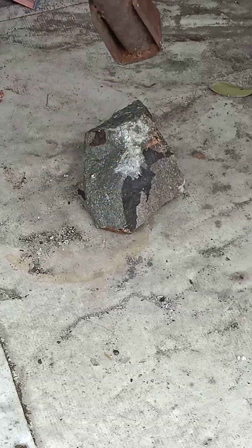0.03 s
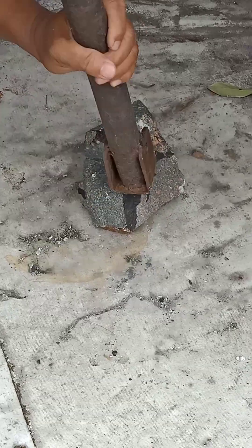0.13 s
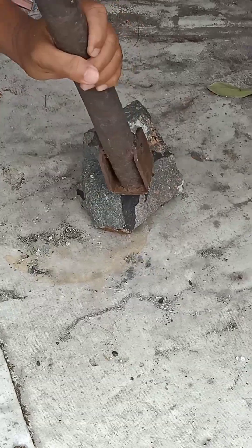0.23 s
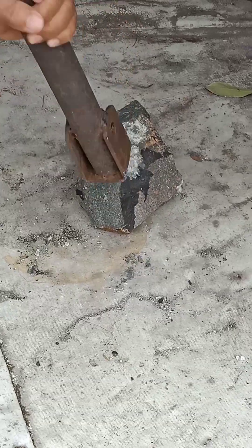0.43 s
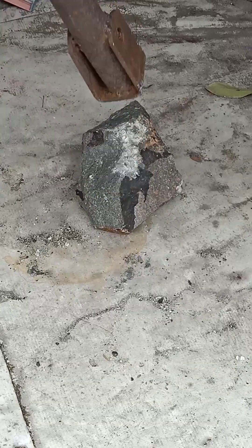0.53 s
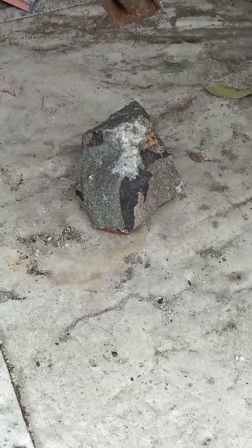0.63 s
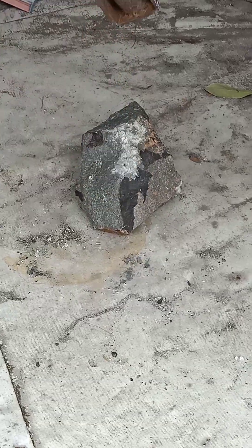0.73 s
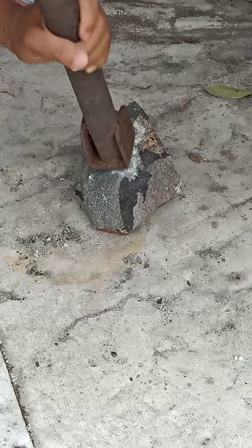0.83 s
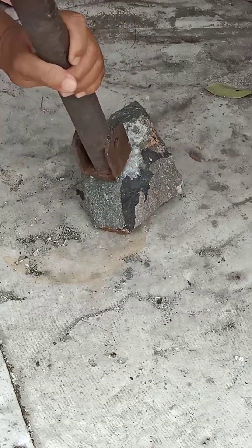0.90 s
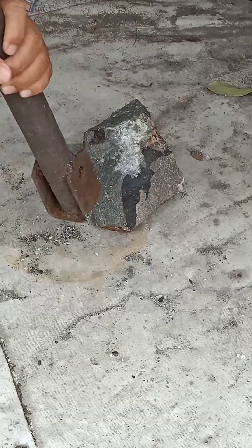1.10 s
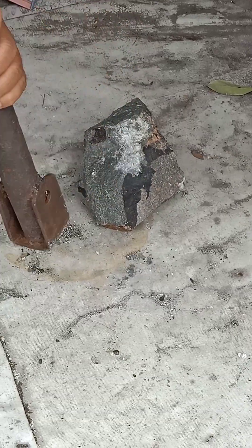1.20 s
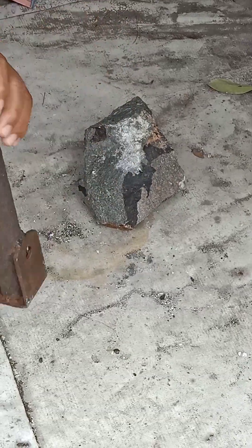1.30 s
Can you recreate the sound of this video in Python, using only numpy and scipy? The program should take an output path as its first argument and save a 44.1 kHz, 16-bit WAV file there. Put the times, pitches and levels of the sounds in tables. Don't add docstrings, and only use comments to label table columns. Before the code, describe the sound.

Two hard, clipped knocks of metal on stone, each ringing briefly, then a faint scuff on concrete

```python
import sys
import numpy as np
from scipy import signal
from scipy.fft import rfft, irfft, next_fast_len
from scipy.io import wavfile
from scipy.ndimage import uniform_filter1d, map_coordinates

SR = 44100
rng = np.random.default_rng(int(sys.argv[2]) if len(sys.argv) > 2 else 0)


def persist_wave(psi):
    counts = np.round(np.clip(psi, -1, 1) * 32767).astype(np.int16)
    wavfile.write(sys.argv[1], SR, np.atleast_2d(counts).T)


def magnitude_from_level(level_db):
    exponent = np.asarray(level_db, float) / 20
    return 10 ** exponent


N = 59535

# (time [s], knock level [dB], ring level [dB], contact time [s])
BLOWS = [
    (0.2306, 4.5, -25.5, 0.000081),
    (0.9581, 3, -30, 0.00008),
]
# (time after blow [s], level [dB])
CRUSH_STEPS = [
    [(-.0014, -41.5), (0, -8.5), (.00045, 2), (.0013, 5), (.0021, 2)],
    [(-.0015, -38), (-.0004, -5.5), (.0007, -0.5), (.0012, -3.5), (.003, -14)],
]
# (centre [Hz], width [Hz], level [dB])
ROCK_FACES = [
    [(207.7, 32, -8.5), (325, 98, -5.5), (487, 110, 3), (748, 198, 1.5), (990, 230, -8.5), (1227, 110, -12),
     (1744, 140, 9.5), (2250, 550, 5.5), (6496, 897, -9.5), (9350, 100, -28), (12400, 1200, -14.5)],
    [(210, 83, -1.5), (504, 248, 0.5), (1100, 430, -14), (1747, 180, -3), (1207, 356, -4), (2238, 197, 7.5),
     (3775, 69, 0.5), (5010, 534, -6.5), (7810, 550, -9.5), (9450, 87, -36), (11970, 770, -21),
     (13500, 450, -11), (15300, 400, -30)],
]
# (frequency [Hz], left lead [rad])
KNOCK_LEAD = [
    [(0, 0.5), (200, 0.5), (600, 1.4), (2300, 0.59), (5000, 2.8), (12000, 1.7)],
    [(0, -0.72), (200, 0.32), (600, 0.76), (2200, 0.82), (5000, 3.1), (12000, 1.4)],
]
# (frequency [Hz], left-right [dB])
KNOCK_LEAN = [
    [(130, 6), (290, -1), (640, -2), (1410, -3), (3100, -4), (6800, -3.5), (13000, -6.5)],
    [(130, 7.5), (290, -6), (640, -2), (1410, -2), (3100, -3.5), (6800, -7), (13000, -9)],
]

TUBE_HZ = [3044, 3044, 3655, 4177, 4168, 4852, 5227, 5496, 7060, 7800]
PLATE_HZ = [9351, 10360, 11470, 11650, 12035, 13650, 15050, 9055, 11030, 12800]
# (first blow level [dB], second blow level [dB], t60 [s], left-right [dB])
STEEL_MODES = [(3.5, 2, 0.35, 3.5), (-20.5, -21, 1, -8), (-29.5, 3, 0.06, -3), (-6, -47, .17, -2.5),
               (-19, -34, 0.58, -1.5), (-26, -29, 0.18, 11), (-20, -28, 0.21, 2), (-32.5, -33, 0.2, 5),
               (-30, -26, 0.16, 1.5), (-30.5, -15, 0.14, 1), (-35, -47, 0.089, -1.5), (-30, -31, 0.12, 0),
               (-26.5, -40, 0.14, 3), (-29.5, -33, .12, -3.5), (-28, -25.5, .13, -5.5), (-36, -24, .1, -3),
               (-30.5, -27, 0.09, -2), (-37.5, -27, .1, 4), (-40.5, -27.5, .11, -1), (-34, -28, .09, -1)]
# (twins' t60 factor [-], second twin's drop [Hz], other modes' t60 factor [-])
GRIP = [
    (1, 3.7, 0.71),
    (1.4, 4.1, 0.93),
]
# (pitch [Hz], level [dB], t60 [s])
EARLIER_RING = [
    (3406, -68.5, 0.54),
    (3010, -67, 0.27),
]
RING_RISE_S = 0.0018
RUST_WAVER_RAD, RUST_RATE_HZ = 0.35, 50

# (frequency [Hz], density [dB per Hz])
CHATTER_SPECTRUM = [(60, -48), (130, -5.5), (500, -4), (1300, -11), (2200, -3), (3000, -21.5), (5500, -22),
                    (8000, -68)]
CHATTER_DB, CHATTER_T60_S = -18.5, 0.084

# (frequency [Hz], t60 [s])
YARD_T60 = [(120, 0.52), (300, 0.48), (600, 0.36), (1200, 0.36), (2000, 0.21), (6000, 0.15), (12000, 0.15)]
# (frequency [Hz], gain [dB])
YARD_TONE = [(150, -2), (450, -1), (900, -1), (1800, -6), (2400, -5), (3100, 0.5), (5000, 2.5)]
YARD_KNOCK_DB, YARD_RING_DB, YARD_TOP_HZ = -14, -9, 5900

# (time [s], level [dB], pitch [Hz], push or pull [+1/-1])
THUMPS = [(1.306, -39, 600, -1), (1.311, -31, 900, 1), (0.288, -38, 131, 1), (.52, -42, 80, 1),
          (1.011, -32, 131, 1), (1.2563, -38, 650, 1), (.261, -19.5, 444, 1), (.274, -40, 480, -1),
          (0.289, -26, 330, 1), (0.49, -39, 192, 1), (0.5099, -34.5, 325, 1), (0.53, -39, 232, 1),
          (0.541, -58, 200, 1), (0.5607, -37.5, 307, -1), (0.602, -43, 147, 1), (0.636, -58, 151.5, 1),
          (0.771, -42, 142, -1), (1.18, -41, 200, 1), (1.217, -46, 200, 1), (1.321, -32.5, 175, -1)]
# (time [s], level [dB], length [s])
SCUFFS = [
    (1.165, -59, 0.024),
    (1.2555, -38, 0.0055),
    (1.263, -41.5, 0.014),
    (1.272, -46.5, 0.028),
    (1.3045, -40.5, 0.011),
    (1.31, -38, 0.016),
    (1.32, -41, 0.026),
]
# (frequency [Hz], density [dB per Hz])
SCUFF_SPECTRUM = [(180, -14), (300, -17), (540, -3.5), (900, 0), (1300, -7.5), (2100, -8), (3300, -20),
                  (8500, -42)]
# (time [s], level [dB], length [s])
DUST = [
    (.125, -51, 0.0055),
    (.401, -52, 0.007),
    (.412, -64, 0.0056),
    (.479, -54, 0.0039),
    (.546, -65, 0.0095),
    (.704, -50.5, 0.003),
    (.785, -50, 0.0075),
    (1.26, -46, 0.033),
]
# (frequency [Hz], density [dB per Hz])
DUST_SPECTRUM = [(600, -31), (1300, -4), (2300, 24), (3500, -12), (5800, 6), (8000, -15), (14000, -13),
                 (16000, -27.5)]
# (time [s], level [dB], length [s])
FLAKES = [
    (.43, -90, 0.019),
    (.461, -75.5, 0.0037),
    (.465, -88, 0.035),
    (.69, -90, .02),
    (.786, -86.5, .01),
    (1.257, -72.5, 0.022),
]
# (frequency [Hz], density [dB per Hz])
FLAKE_SPECTRUM = [(6000, -40), (8500, -9.5), (12000, -5.5), (14300, 4.5), (16000, -10)]
GRIT_DEPTH_DB, GRIT_RATE_HZ = 3, 600

# (time [s], level [dB], left-right [dB])
HUSH = [
    (0, -62, -2),
    (0.202, -63, -1.5),
    (.3, -52.5, -1),
    (.6, -57, -3),
    (.95, -57.5, -1.5),
    (1.35, -53, -2.5),
]
# (frequency [Hz], density [dB per Hz])
AIR_SPECTRUM = [(200, -0.5), (1600, -6), (2300, -0.5), (2850, -6.5), (3600, -17), (5900, -14),
                (7800, -34.5), (10000, -40.5), (16000, -40.5)]
# (frequency [Hz], density [dB per Hz])
HUM_SPECTRUM = [(15, -51.5), (30, -17.5), (70, -7.5), (113, 0.5), (150, -10), (300, -16.5), (500, -52.5)]
# (frequency [Hz], left-right correlation [-])
HUSH_ALIKE = [(60, 0.3), (180, 0.9), (550, 0.7), (1650, 0.24), (5000, 0), (15000, 0.2)]
HUM_DB = -4

CEILING, KNEE = 0.87, 10
LOW_CUT_HZ, ROLL_HZ, TOP_HZ = 95, 15400, 16550
SIDES = np.array([[0.5], [-0.5]])


def blows():
    out = earlier_ring() * np.ones((2, 1))
    slab = chatter()
    for blow, (s, knock_db, ring_db, contact_s) in enumerate(BLOWS):
        stone = knock(s, knock_db, contact_s, CRUSH_STEPS[blow], ROCK_FACES[blow])
        steel = ring(s, ring_db, blow)
        out += placed(stone, KNOCK_LEAD[blow], KNOCK_LEAN[blow]) + steel
        out += yard(magnitude_from_level(YARD_KNOCK_DB) * stone + magnitude_from_level(YARD_RING_DB) * steel[0])
        t, _ = since(s)
        out += (1 - np.exp(-t / RING_RISE_S)) * magnitude_from_level(knock_db + CHATTER_DB - 60 * t / CHATTER_T60_S) * slab
    return out


def knock(s, db, contact_s, steps, face):
    def response(f):
        contacts = sum(magnitude_from_level(db + 21.5 + step_db) * np.exp(-2j * np.pi * f * (s + late))
                       for late, step_db in steps)
        softness = 1 / (1 + 2j * np.pi * f * contact_s) ** 2
        low_cut = (f / (f - 1j * LOW_CUT_HZ)) ** 2
        stone = 0
        for k, (centre, width, level_db) in enumerate(face):
            mode = 1j * f * width / (centre * centre - f * f + 1j * f * width)
            stone = stone + (-1) ** k * magnitude_from_level(level_db) * mode
        return contacts * softness * low_cut * stone
    return filtered(np.ones(1), response)


def placed(stone, lead, lean):
    return filtered(stone, lambda f: magnitude_from_level(SIDES * along(lean, f)) * np.exp(1j * SIDES * along(lead, f)))


def ring(s, db, blow):
    t, on = since(s)
    twin_factor, split_hz, other_factor = GRIP[blow]
    out = np.zeros((2, N))
    for k, (hz, row) in enumerate(zip(list(TUBE_HZ) + list(PLATE_HZ), STEEL_MODES)):
        if k == 1:
            hz = hz - split_hz
        t60_s = row[2] * (twin_factor if k < 2 else other_factor)
        right_phase = rng.uniform(-1, 1) * min(hz / 9000, 0.8)
        waver = RUST_WAVER_RAD * (hz / 10000) ** 2 * wobble(RUST_RATE_HZ)
        tone = np.sin(2 * np.pi * hz * t + np.array([[0], [right_phase]]) + waver)
        out += magnitude_from_level(db + row[blow] - 60 * t / t60_s) * magnitude_from_level(SIDES * row[3]) * tone
    return on * (1 - np.exp(-t / RING_RISE_S)) * out


def earlier_ring():
    t, _ = since(0)
    return sum(magnitude_from_level(db - 60 * t / t60_s) * np.sin(2 * np.pi * hz * t) for hz, db, t60_s in EARLIER_RING)


def chatter():
    noise = rush(CHATTER_SPECTRUM, [(300, 0.25), (5000, 0.084)], patchy_db=-0.5)
    return filtered(noise * magnitude_from_level(4.1 * wobble(300)), lambda f: 1 / (1 + (f / YARD_TOP_HZ) ** 10))


def yard(x):
    walls = filtered(x, lambda f: magnitude_from_level(along(YARD_TONE, f)) / (1 + (f / YARD_TOP_HZ) ** 20))
    hz, t, z = signal.stft(rng.standard_normal((2, SR // 2)), SR, nperseg=256)
    decay = magnitude_from_level(-60 * t / along(YARD_T60, hz)[:, None])
    tail = signal.istft(z * decay, SR, nperseg=256)[1]
    late = np.pad(walls, (200, 0))
    return signal.fftconvolve(late[None], tail / np.linalg.norm(tail[0]), axes=1)[:, :N]


def handling():
    out = thumps() + scrape(SCUFFS, SCUFF_SPECTRUM)
    return out + scrape(DUST, DUST_SPECTRUM) + scrape(FLAKES, FLAKE_SPECTRUM)


def thumps():
    out = np.zeros(N)
    for s, db, hz, way in THUMPS:
        u = 3 * np.pi * hz * since(s)[0]
        out += magnitude_from_level(db + 12) * np.sign(way) * (1 - u / 3) * u * u / 2 * np.exp(-u)
    return out * magnitude_from_level([[-1.5], [1.5]])


def scrape(strokes, spectrum):
    shape = np.zeros(N)
    for s, db, length_s in strokes:
        t, on = since(s)
        shape += magnitude_from_level(db) * on * (1 - np.exp(-t / length_s * 6)) * np.exp(-(t / length_s) ** 2)
    noise = rush(spectrum, [(500, 0.15), (5000, 0.11)], patchy_db=4)
    return shape * unit(magnitude_from_level(GRIT_DEPTH_DB * wobble(GRIT_RATE_HZ)) * noise)


def hush():
    s, *cols = np.transpose(HUSH)
    level_db, pan_db = (np.interp(np.arange(N) / SR, s, c) for c in cols)
    air = filtered(rush(AIR_SPECTRUM, HUSH_ALIKE, patchy_db=2), lambda f: f * f / (f * f + 150 ** 2))
    hum = magnitude_from_level(HUM_DB + 2.3 * wobble(25.04)) * rush(HUM_SPECTRUM, HUSH_ALIKE, patchy_db=2)
    return magnitude_from_level(level_db + SIDES * pan_db) * (air + hum)


def rush(spectrum, alike, patchy_db):
    z = signal.stft(rng.standard_normal((2, N)), nperseg=512)[2]
    field = uniform_filter1d(rng.standard_normal(z.shape[1:]), size=6, axis=0)
    field = uniform_filter1d(field, size=8, axis=1)
    pair = signal.istft(z * magnitude_from_level(patchy_db * unit(field)), nperseg=512)[1][:, :N]

    def mid_side(hz):
        turn = np.arccos(np.clip(along(alike, hz), -1, 1)) / 2
        return magnitude_from_level(along(spectrum, hz)) * np.array([np.cos(turn), np.sin(turn)])
    mid, side = filtered(pair, mid_side)
    return unit(np.array([mid + side, mid - side]))


def filtered(x, response):
    m = next_fast_len(N + SR // 2)
    return irfft(rfft(x, m) * response(np.fft.rfftfreq(m, 1 / SR)), m)[..., :N]


def along(points, hz):
    f, v = np.transpose(points)
    return np.interp(np.log(hz + 1), np.log(f + 1), v)


def wobble(rate_hz):
    return map_coordinates(rng.standard_normal(N // 20), [np.arange(N) * min(rate_hz, 2000) / SR])


def since(s):
    t = np.arange(N) / SR - s
    return np.maximum(t, 0), t >= 0


def unit(x):
    return x / np.sqrt(np.mean(x ** 2) + 1e-20)


def scene():
    return blows() + handling() + hush()


def band_limit(x):
    return signal.sosfilt(signal.butter(12, 16530, fs=SR, output="sos"), x)


def record(dry):
    clipped = dry / (1 + np.abs(dry / CEILING) ** KNEE) ** (1 / KNEE)

    def band(hz):
        low_cut = (hz / (hz - 0.5j * LOW_CUT_HZ)) ** 2
        return (hz < TOP_HZ) * low_cut / (1 + (hz / ROLL_HZ) ** 10)
    return band_limit(filtered(clipped, band))


dry = scene()
out = record(dry)
persist_wave(out)
```